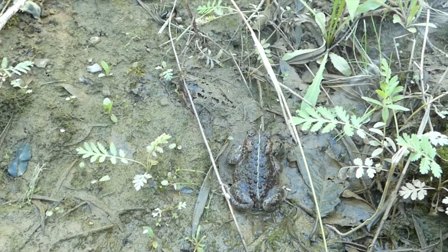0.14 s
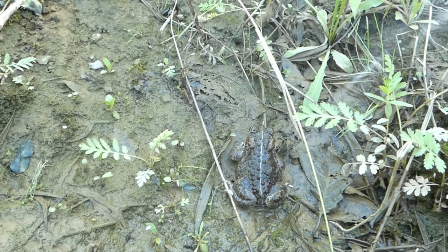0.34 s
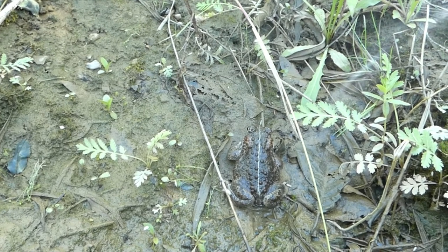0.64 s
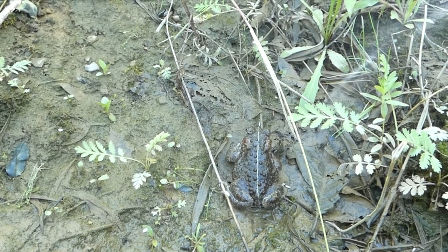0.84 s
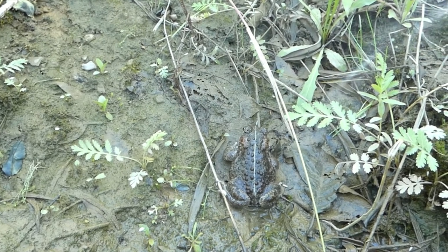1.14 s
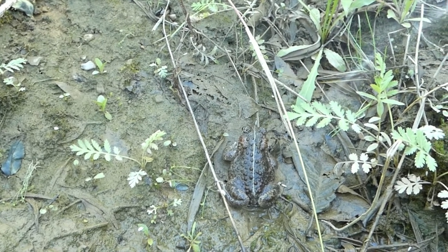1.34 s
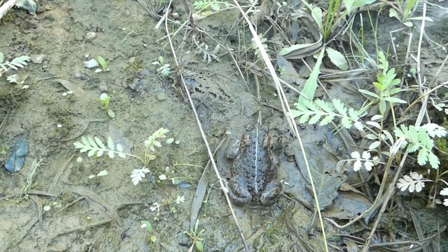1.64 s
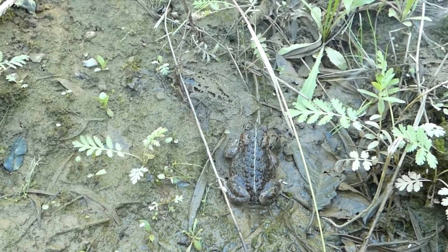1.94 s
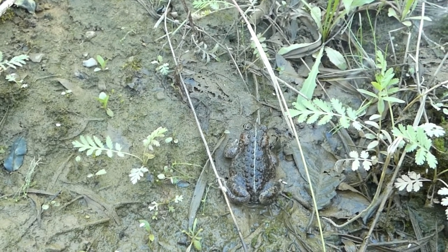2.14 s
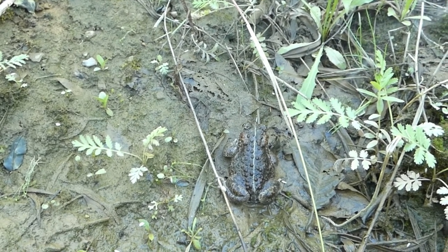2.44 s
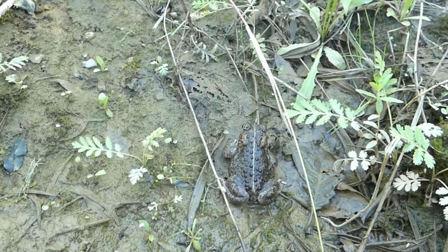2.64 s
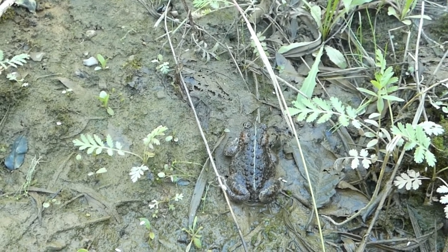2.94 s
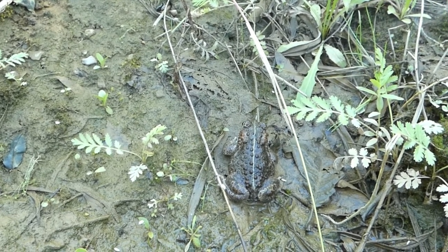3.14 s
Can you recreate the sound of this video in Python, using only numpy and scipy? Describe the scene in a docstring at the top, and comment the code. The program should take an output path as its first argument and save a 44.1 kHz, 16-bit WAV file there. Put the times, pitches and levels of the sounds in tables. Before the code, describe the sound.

Toad chorus outdoors on muddy ground: quick purring trills trade and overlap left of centre, distant toads blur behind, a small bird chirps early, faint dull taps knock the stereo microphone over steady hiss.

```python
"""Four toads trill a little to the left, often overlapping: a near one, a deeper one, a higher one
and one heard in a single short burst. A far chorus blurs behind them, a small bird chirps four times,
faint taps knock on a stereo camera, and an outdoor hiss with a low rumble fills the gaps.
Each trill is a train of short pulses ringing the vocal sac; the bird is a set of falling whistles,
the taps are short dull rings, and the hiss is noise shaped band by band."""
import sys
import numpy as np
from scipy import signal
from scipy.fft import rfft, irfft
from scipy.io import wavfile
from scipy.ndimage import uniform_filter1d, map_coordinates

SR = 44100
rng = np.random.default_rng(int(sys.argv[2]) if len(sys.argv) > 2 else 0)


def generate_wav(signal):
    """Clip the signal to [-1, 1] and save it as 16-bit WAV at the path in sys.argv[1]."""
    frames = np.transpose(np.atleast_2d(signal))
    scaled = np.clip(frames, -1, 1) * 32767
    pcm = np.round(scaled).astype(np.int16)
    wavfile.write(sys.argv[1], SR, pcm)


N = 145530  # length of the scene [samples], 3.3 s

RISE_S = .0012  # time scale of the upward swing of a pulse [s]


def undb(db):
    """Turns decibels into a factor on the amplitude."""
    return 10 ** (np.asarray(db) / 20)


def level(x, db):
    """Scales a sound to a given average (RMS) level in dB."""
    return x * undb(db) / np.sqrt(np.mean(x ** 2))


def walk(rate):
    """A smooth random wander, `rate` new values a second, with a spread near 1."""
    hold = int(SR / rate)
    steps = np.repeat(rng.standard_normal(N // hold + 1), hold)
    smooth = uniform_filter1d(uniform_filter1d(steps, hold), hold)
    return 1.64 * smooth[:N]  # smoothing shrinks the spread; 1.64 brings it back


def place(x, pan_db, lead_ms):
    """Makes a sound stereo: left is louder by pan_db and earlier by lead_ms."""
    n = np.arange(N)
    late = map_coordinates(x, [n - lead_ms * SR / 1000], order=3, mode="mirror")
    left_gain, right_gain = undb(pan_db / 2), undb(-pan_db / 2)
    return np.array([x * left_gain, late * right_gain]) * 2 / (left_gain + right_gain)


def scatter(x, db, t60, rise_s=0.0018):
    """Adds a dense echo that falls by 60 dB in t60 seconds, partly different in each channel."""
    apart_share = 0.11  # how strong the part is that differs left and right
    t = np.arange(int(SR * .5)) / SR
    both, apart = rng.standard_normal((2, len(t)))
    noise = both + apart_share * apart * np.array([[1], [-1]])
    tail = noise * np.exp(-np.log(1000) * t / t60) * (1 - np.exp(-t / rise_s))
    tail = tail * undb(db) / np.sqrt(np.sum(tail ** 2, axis=1, keepdims=True))
    return x + signal.fftconvolve(x, tail, axes=1)[:, :N]


def add(out, at_s, db, hz, pulse, slow=1.):
    """One pulse swings up and rings out; its pitch starts flat and rises; `slow` stretches the swing."""
    glide_s = .001  # time scale of the rise in pitch [s]
    width_hz, flat_hz, over_hz, over_db = pulse
    i = int(round(at_s * SR))
    t = np.arange(1200) / SR
    rise = (1 - np.exp(-t / (RISE_S * slow))) ** 2
    swing = rise * np.exp(-np.pi * width_hz * t / np.sqrt(slow))  # a wider ring dies sooner
    turn = 2 * np.pi * (hz * t - flat_hz * glide_s * (1 - np.exp(-t / glide_s)))
    upper = undb(over_db) * np.sin(2 * np.pi * over_hz * t)
    ring = undb(db) * swing / swing.max() * (np.sin(turn) + upper)
    out[i:i + len(t)] += ring[:max(N - i, 0)]


def toad(trills, pulse, scatter_db):
    """Pulses ring the vocal sac at a gliding rate, each varying in time, strength, pitch and shape."""
    jitter_s, wobble_hz, shape_spread = .0011, 15, .18  # typical change from pulse to pulse
    out = np.zeros(N)
    for start, end, rate0, rate1, db0, db1, hz in trills:
        chance = rng.standard_normal((60, 4))
        t = start
        for late, size, shift, shape in chance:
            if t > end:
                break
            along = (t - start) / (end - start)
            db = db0 + (db1 - db0) * along + scatter_db * size
            at_s = max(t - 2 * RISE_S + jitter_s * late, 0)  # begins ahead so that it peaks near t
            add(out, at_s, db, hz + wobble_hz * shift, pulse, np.exp(shape_spread * shape))
            t += 1 / (rate0 + (rate1 - rate0) * along)
    return out


def hiss():
    """Outdoor noise in octave bands that swell together and flicker alone, partly alike left and right."""
    # colour of the noise: (frequency [Hz], relative level per Hz [dB], left-right likeness [0 to 1],
    # left minus right [dB])
    bands = [(25, -45, .3, -1), (60.5, -25.5, 0.38, -4), (139, -14, 0.54, 2), (272, -12, 0.61, -1.5),
             (360, -17.5, 0.19, -2.5), (394, -15, 0.22, 0), (615, -18, 0.025, 1.5), (1020, -19, 0.54, -1),
             (1380, -11, 1, 7.5), (2340, -21.5, 0.73, 2.5), (3270, -20, 0.93, 1), (5640, -20.5, 0.77, 1.5),
             (6820, -24, 0.87, 2), (8060, -29, 0.64, 1.5), (9820, -29.5, 0.63, 2.5), (11700, -39, 0.34, 0),
             (15400, -55, 0.18, -1)]
    # slow rise and fall of the treble around its own mean: (time [s], relative level [dB])
    treble_swell = [(0.0, -59.5), (.78, -59), (.84, -59), (1.5, -59.5), (1.65, -56.5), (2.05, -56.5),
                    (2.11, -56), (2.2, -57), (3.18, -60), (3.3, -57)]
    gust_db, flicker_db, treble_flicker_db = 0.63, 0.74, 0.9  # the last counts per octave above 4 kHz

    f = np.maximum(np.arange(N // 2 + 1) * SR / N, 1)
    hz, db, like, pan_db = np.array(bands).T

    def read(column):
        return np.interp(np.log(f), np.log(hz), column)

    like = np.clip(read(like), 0, 1)
    below_db = 24 * np.maximum(np.log2(hz[0] / f), 0)  # falls 24 dB per octave below the first row
    mid, side = rfft(rng.standard_normal((2, N)), axis=1) * undb(read(db) - below_db)
    mid, side = mid * np.sqrt(1 + like), side * np.sqrt(1 - like)
    left = (mid + side) * undb(read(pan_db) / 2)
    right = (mid - side) * undb(-read(pan_db) / 2)
    pair = np.array([left, right])

    when, treble_db = np.array(treble_swell).T
    treble_db = np.interp(np.arange(N) / SR, when, treble_db - treble_db.mean())
    out, gust = 0, walk(6)
    for octave in range(10):  # centred on 31.25 Hz, 62.5 Hz and so on; neighbours overlap
        place_in_octaves = np.clip(np.log2(f / 31.25), 0, 9)
        share = np.clip(1 - np.abs(place_in_octaves - octave), 0, 1)
        swell_db = gust_db * gust + flicker_db * walk(14)
        swell_db = swell_db + np.clip((octave - 6) / 2, 0, 1) * treble_db
        swell_db = swell_db + treble_flicker_db * max(octave - 7, 0) * walk(10.33)
        out = out + irfft(pair * share, N, axis=1) * undb(swell_db)
    return level(out, -46)


def far_chorus():
    """Distant toads, each with its own pitch, pulse rate and turn, blurred by a long echo."""
    toads, centre_hz, spread_hz = 9, 1723, 169
    every_s, trill_s = .55, .36
    pulse = (120, 90, 3400, -22)  # ring width [Hz], starts flat by [Hz], upper ring [Hz], its level [dB]
    out = 0
    for pitch, (pace, turn) in zip(np.linspace(-1, 1, toads), rng.random((toads, 2))):
        starts = np.arange(-turn * every_s, N / SR, every_s)
        hz, rate = centre_hz + spread_hz * pitch, 55 + 15 * pace
        trills = [(max(s, 0), s + trill_s, rate, rate, 0, 0, hz) for s in starts if s + .4 > 0]
        out = out + toad(trills, pulse, 1.5)
    stereo = place(out, 3.8, 0.09)
    return level(scatter(stereo, 0.98, 0.28), -47)


def high_and_fourth_toad():
    """The higher toad, and a short burst from a fourth, lower-pitched toad at 2.55 s, ringing alike."""
    # trills of both: (first pulse [s], end [s], pulse rate at start [per s], at end [per s],
    # pulse level at start [dB], at end [dB], middle pitch [Hz])
    trills = [(.0041, .12, 50.3, 51.5, -36, -52, 1780), (.4345, .6, 62.24, 64.4, -33.5, -38.5, 1727),
              (.9768, 1.19, 67.8, 76.6, -34, -36, 1750), (1.5109, 1.72, 63.04, 72, -37, -38.5, 1758),
              (2.0645, 2.187, 65.5, 78.4, -30.5, -33.5, 1690), (2.4617, 2.67, 54.6, 66.9, -41, -33, 1777),
              (2.55, 2.62, 79.4, 79.5, -34, -32, 1550), (2.9716, 3.27, 60, 60.75, -35, -36, 1770)]
    pulse = (135, 250, 3400, -20)  # ring width [Hz], starts flat by [Hz], upper ring [Hz], its level [dB]
    return place(toad(trills, pulse, 3), 5.7, 0.017)


def low_toad():
    """The deeper toad: mostly slower pulses, at a lower pitch."""
    # its trills: (first pulse [s], end [s], pulse rate at start [per s], at end [per s],
    # pulse level at start [dB], at end [dB], middle pitch [Hz])
    trills = [(.0192, .32, 44.7, 43.4, -34.5, -33, 1442), (.8731, 1.215, 40.1, 51.45, -34, -33.5, 1405),
              (1.8, 2.174, 39.97, 50.47, -36.5, -31.5, 1410), (2.5914, 2.95, 49.03, 48.6, -35, -33.5, 1397),
              (3.1152, 3.23, 47.4, 46.8, -38.5, -36, 1454), (3.25, 3.3, 30, 30, -51, -27, 1420)]
    pulse = (105, 300, 2800, -28)  # ring width [Hz], starts flat by [Hz], upper ring [Hz], its level [dB]
    return place(toad(trills, pulse, 1.5), 4.6, 0.074)


def near_toad():
    """The near toad: loud trills of quick pulses, furthest to the left."""
    # its trills: (first pulse [s], end [s], pulse rate at start [per s], at end [per s],
    # pulse level at start [dB], at end [dB], middle pitch [Hz])
    trills = [(.0905, .427, 63.5, 65, -33, -27, 1627), (.6195, .99, 67.6, 62, -31, -29, 1622),
              (1.2074, 1.53, 69.6, 69.7, -31, -30, 1627), (1.7191, 2.075, 69, 63, -31, -29.5, 1641),
              (2.2774, 2.57, 67.5, 66.5, -31, -26.5, 1634), (2.7812, 3.075, 55.4, 90, -32.5, -28.5, 1602)]
    pulse = (108, 320, 3060, -22)  # ring width [Hz], starts flat by [Hz], upper ring [Hz], its level [dB]
    return place(toad(trills, pulse, 1.6), 7.9, 0.05)


def bird():
    """Short falling whistles of unsteady pitch, with a long echo; two notes make a chirp."""
    # notes: (start [s], length [s], from [Hz], to [Hz], bend of the fall [power], level [dB])
    chirps = [(0.172, 0.067, 4450, 3940, 2.14, -49.5), (.245, 0.017, 3910, 3430, 1.8, -54),
              (0.496, 0.04, 5450, 5290, 2.4, -49.5), (0.533, .042, 4500, 3660, 2.42, -54),
              (.837, 0.048, 4490, 4390, 1.2, -50.5), (0.875, 0.04, 4500, 3660, 1.17, -55),
              (1.137, 0.03, 5450, 5300, 2.3, -47.5), (1.171, .043, 4700, 3590, 2.1, -52)]
    out = np.zeros(N)
    waver_hz = 45 * walk(150)
    for start, length, hz0, hz1, bend, db in chirps:
        u = np.linspace(0, 1, int(length * SR))
        i = int(start * SR)
        hz = hz1 + (hz0 - hz1) * (1 - u) ** bend + waver_hz[i:i + len(u)]
        swell = np.sqrt(2 * np.sin(np.pi * u))
        out[i:i + len(u)] += undb(db) * swell * np.sin(2 * np.pi * np.cumsum(hz) / SR)
    return scatter(place(out, 2, 0), db=-1, t60=.38, rise_s=.025)


def taps():
    """Faint dull knocks on the camera body: one channel is pushed as the other is pulled."""
    # knocks: (time near the peak [s], level [dB], pitch [Hz])
    knocks = [(.408, -43, 690), (.794, -53, 696), (1.329, -48, 665), (1.529, -48, 530), (1.678, -48, 685),
              (1.854, -44, 700), (1.9, -48, 680), (2.038, -49, 530), (2.159, -46, 720), (2.317, -53, 655),
              (2.413, -54, 690), (2.48, -47, 710), (2.573, -48, 527)]
    pulse = (50, 0, 450, -8)  # ring width [Hz], starts flat by [Hz], second ring [Hz], its level [dB]
    out = np.zeros(N)
    for peak_s, db, hz in knocks:
        add(out, peak_s - 3 * RISE_S, db, hz, pulse)
    return place(out, -2, 0) * np.array([[1], [-1]])


def scene():
    """Adds all sounds; ground and plants scatter the toads, the higher and fourth ones a little more."""
    high_and_fourth = scatter(high_and_fourth_toad(), db=-13, t60=.1)
    low_and_near = scatter(low_toad() + near_toad(), db=-15, t60=.08)
    return hiss() + far_chorus() + high_and_fourth + low_and_near + bird() + taps()


def record(dry):
    """The recorder cuts the top: a steep filter takes away what lies above 15.3 kHz."""
    top_hz = 15300
    steep = signal.ellip(10, .2, 60, top_hz, fs=SR, output="sos")
    return signal.sosfilt(steep, dry)


dry = scene()
out = record(dry)
generate_wav(out)
```